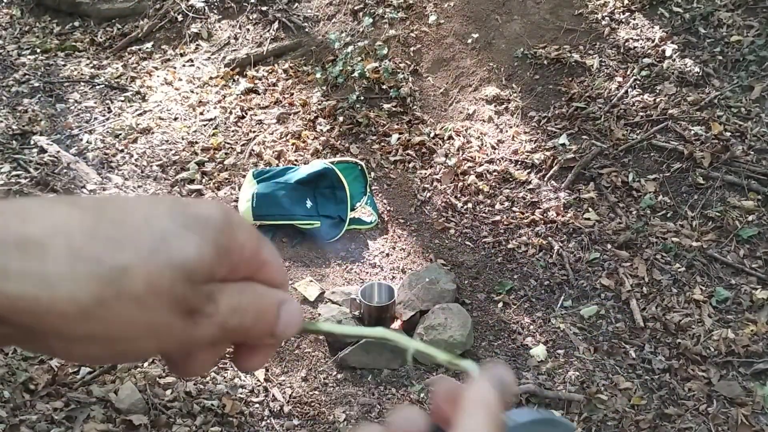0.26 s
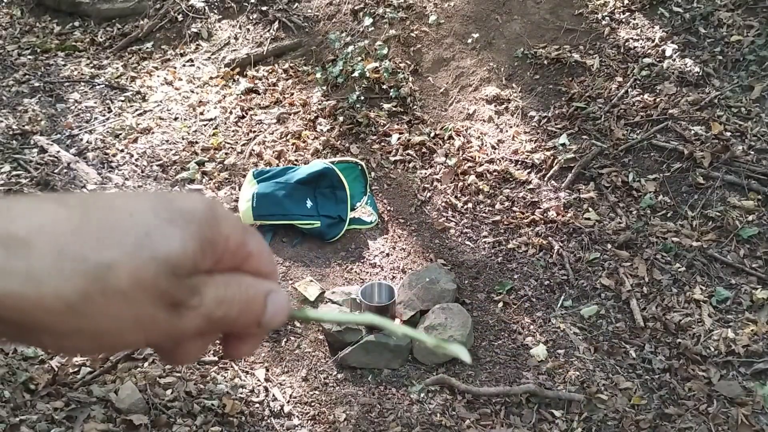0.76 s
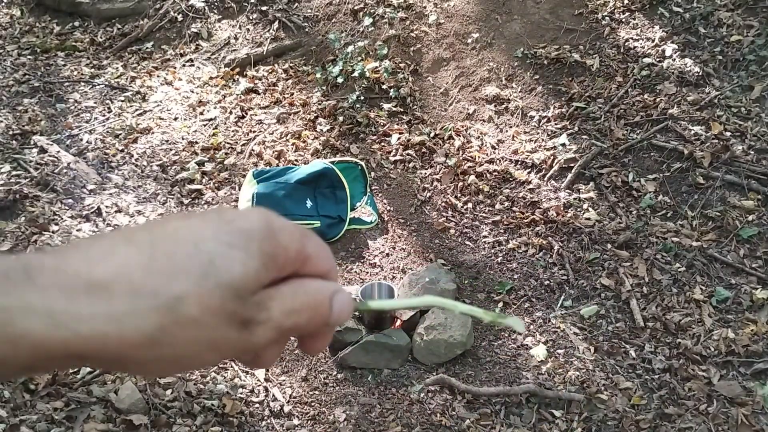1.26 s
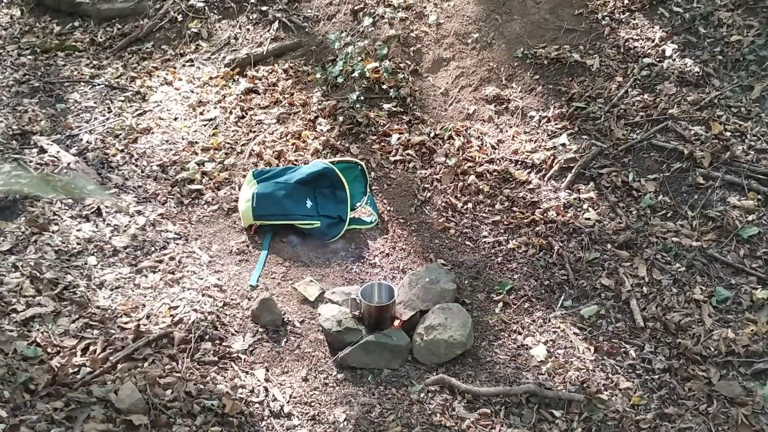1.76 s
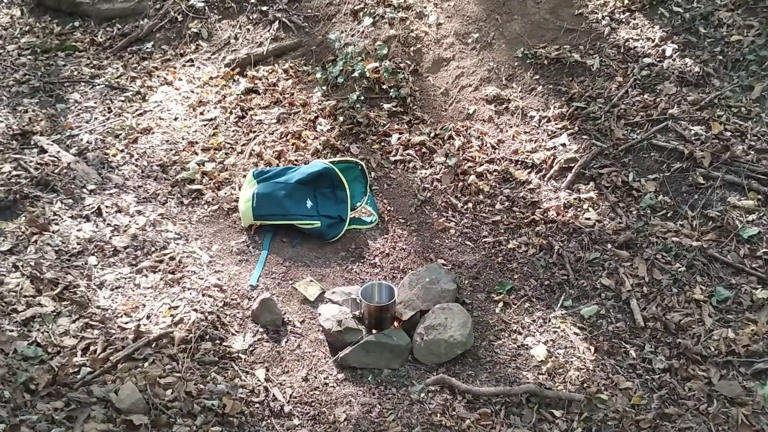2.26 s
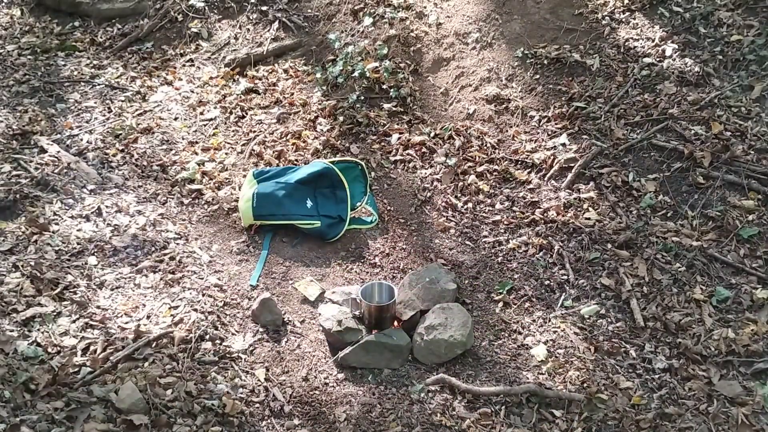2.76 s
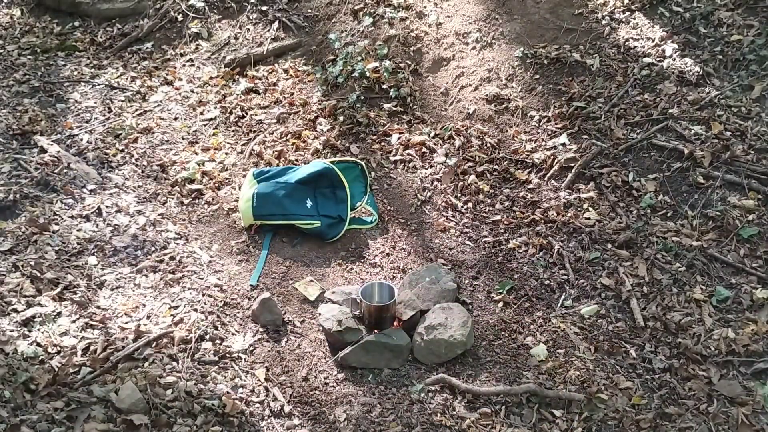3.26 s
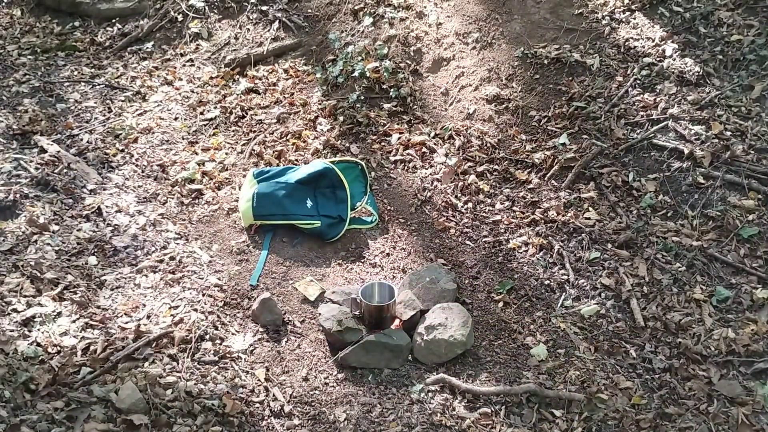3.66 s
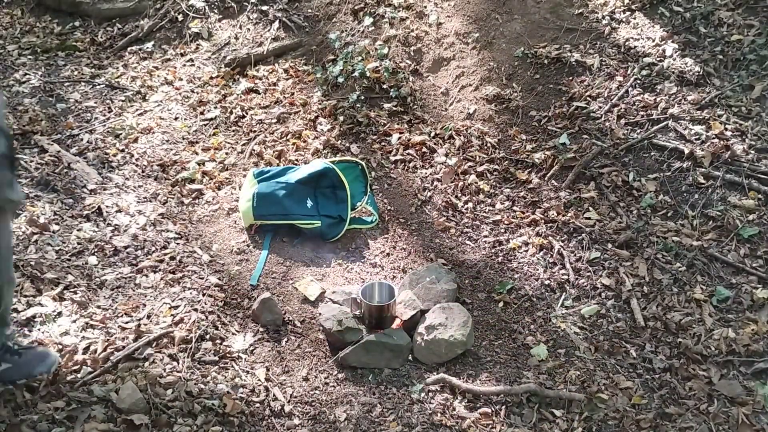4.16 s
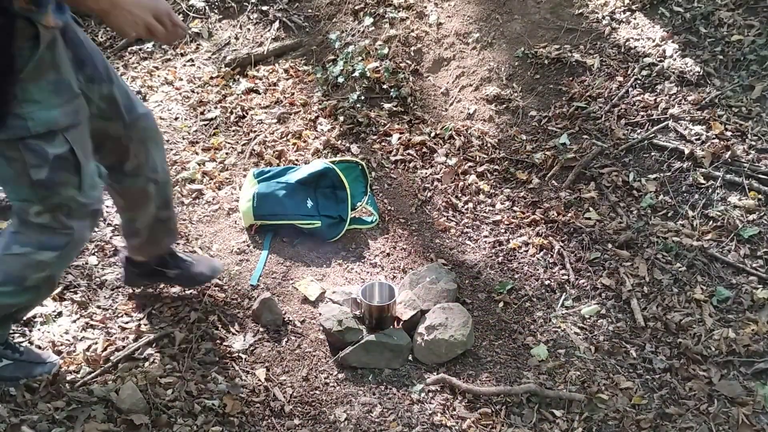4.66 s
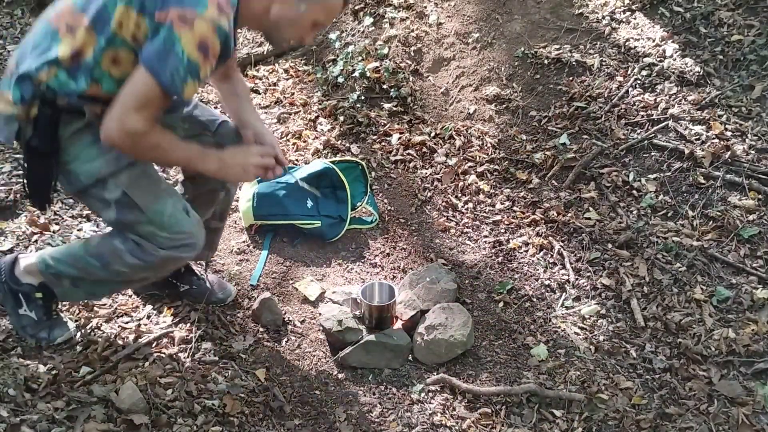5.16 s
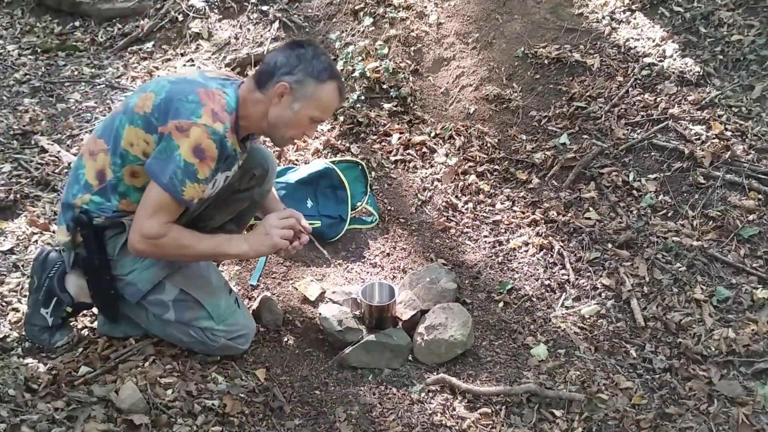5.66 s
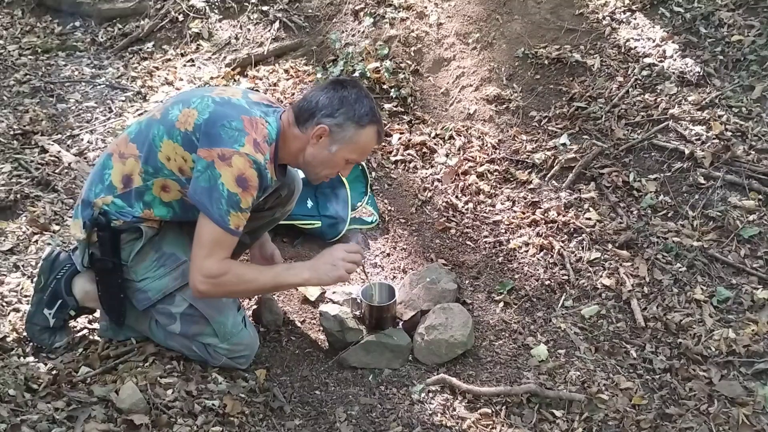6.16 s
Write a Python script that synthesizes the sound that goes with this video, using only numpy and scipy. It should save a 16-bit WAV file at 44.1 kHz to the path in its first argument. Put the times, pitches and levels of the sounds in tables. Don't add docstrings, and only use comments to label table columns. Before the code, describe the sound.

In a quiet forest, soft wind hiss and a couple of dull low bumps at the microphone come first. Then feet shuffle close on the left in brittle dry leaves, building to a loud crunch with snapping twigs. After a near-silent gap, lighter steps crackle round towards the front, and knees press into the leaves. Close stereo microphone, dry open air.

```python
import sys
import numpy as np
from scipy import signal
from scipy.io import wavfile

SR = 44100
rng = np.random.default_rng(int(sys.argv[2]) if len(sys.argv) > 2 else 0)


def attenuation_scalar(level_db):
    decades = np.asarray(level_db, float) / 20
    return 10 ** decades


def dump(signal):
    limited = np.clip(np.atleast_2d(signal).T, -1, 1)
    pcm = np.round(limited * 32767).astype(np.int16)
    wavfile.write(sys.argv[1], SR, pcm)


N = 282240
EDGES_HZ = np.append(25 * 2 ** np.arange(0, 8, .5), np.geomspace(6400, 17000, 6))
BASS_PAN_DB = 4.5


def rms_one(x):
    return x / np.sqrt(np.mean(x ** 2) + 1e-20)


def in_time(rows):
    s, *columns = np.transpose(rows)
    return [np.interp(np.arange(N) / SR, s, c) for c in columns]


def at_hz(points, hz):
    table_hz, value = np.array(points).T
    return np.interp(np.log(hz), np.log(table_hz), value)


def drift(rate):
    r = np.exp(-80 * np.pi * rate / SR)
    slow = signal.lfilter([1], [1, -2 * r, r * r], rng.standard_normal(N // 40 + 2002))[2000:]
    return np.interp(np.arange(N) / 40, np.arange(len(slow)), rms_one(slow))


def late(x, ms):
    fine = signal.resample_poly(x, 4, 1)
    return np.interp(np.arange(N) - ms * SR / 1000, np.arange(len(fine)) / 4, fine)


def bands(source, edges, alike_table, gain_of_band):
    out = 0
    for k, (low, high) in enumerate(zip(edges, edges[1:])):
        band = signal.butter(2, [low, high], "band", fs=SR, output="sos")
        shared, own = signal.sosfilt(band, source[k % 2])
        hz = np.sqrt(low * high)
        alike = np.clip(at_hz(alike_table, hz), 0, 1)
        second = alike * shared + np.sqrt(1 - alike ** 2) * own
        out = out + gain_of_band(hz) * np.array([shared, second])
    return out


def resonance(x, hz, width_hz):
    r = np.exp(-np.pi * width_hz / SR)
    poles = [1, -2 * r * np.cos(2 * np.pi * hz / SR), r * r]
    return signal.lfilter((1 - r * r) / 2 * np.array([1, 0, -1]), poles, x)


def add(out, s, sound, db):
    at = round(s * SR) - np.abs(sound[0]).argmax()
    out[:, at:at + sound.shape[1]] += attenuation_scalar(db) * sound / np.abs(sound).max(axis=1, keepdims=True)


# start_s, right_port_late_ms, left_over_right_db, fullness_db_per_octave (below the crackle)
WALKER = [(0, .32, 10, 5), (1.25, .32, 10.5, 4), (1.5, .32, 12, .5), (2.22, .33, 13.5, 2.5),
          (2.4, .33, 14, .5), (2.6, .33, 13.5, 0), (3.7, .29, 12.5, 1.5), (4.2, .22, 10, .6),
          (4.9, .21, 10, 0), (5.3, .17, 7.5, 0), (5.8, .14, 9, -1), (6.4, .14, 9, -.5)]


def walker():
    return in_time(WALKER)


# start_s,
# level_db, swell_s (20 dB), hold_s, fade_s (20 dB)
TREADS = [(1.219, -51.5, 0.058, 0.061, 0.112), (1.369, -53.5, 0.5, 0.197, 0.19),
          (1.653, -46.0, 0.113, 0.059, 0.122), (1.788, -49.5, 0.179, 0.086, 0.177),
          (1.928, -36.0, 0.101, 0.034, 0.154), (2.075, -46.0, 0.471, 0.071, 0.105),
          (2.211, -36.5, 0.023, 0.022, 0.04), (2.273, -43.0, 0.183, 0.041, 0.008),
          (2.357, -36.0, 0.076, 0.006, 0.011), (2.393, -30.5, 0.026, 0.071, 0.08),
          (2.517, -45.0, 0.26, 0.049, 0.192), (2.61, -56.5, 0.088, 0.126, 0.041),
          (2.83, -41.5, 0.018, 0.009, 0.05), (2.872, -49.5, 0.037, 0.024, 0.142),
          (2.997, -57.5, 0.02, 0.103, 0.107),
          (3.598, -42.5, .024, .025, .116), (3.697, -47, .018, .012, .06), (3.728, -42, .04, .008, .04),
         (3.776, -50.5, .226, .023, .094), (3.865, -53, .035, .01, .06), (3.892, -48, .03, .008, .05),
         (3.95, -64, .1, .07, .08), (4.12, -49, .06, .03, .348), (4.185, -32, .06, .053, .057),
         (4.304, -53.5, .34, .015, .035), (4.791, -48, .022, .03, .101), (4.849, -51.5, .089, .181, .035),
         (5.088, -44.5, .045, .03, .045), (5.155, -47, .02, .014, .087), (5.25, -50, .008, .002, .025),
         (5.605, -46, .015, .016, .058), (5.718, -41, .176, .003, .12), (5.794, -40, .077, .046, .221),
         (5.875, -46, .022, .106, .027), (6.02, -58.5, .03, .024, .315), (6.203, -59.5, .023, .11, .418)]
SETTLING_DB, SETTLING_FROM_S = -68, 1.1


def rustle_db():
    t = np.arange(0, N + 40, 40) / SR
    power = attenuation_scalar(2 * SETTLING_DB) * (t > SETTLING_FROM_S) + 1e-12
    for s, db, swell_s, hold_s, fade_s in TREADS:
        before, after = (s - t) / swell_s, (t - s - hold_s) / fade_s
        away = np.maximum(np.maximum(before, after), 0)
        power = power + attenuation_scalar(2 * (db - 20 * away))
    return np.interp(np.arange(N) / SR, t, 10 * np.log10(power))


def crackle(per_s, spread_db, clump_db, burst_ms, bed_db):
    born = rng.random(N) < per_s * attenuation_scalar(clump_db * drift(30)) / SR
    size = np.minimum(rng.exponential(1, N), 3.2)
    power = born * attenuation_scalar(2 * spread_db * size)
    r = np.exp(-2000 / (burst_ms * SR))
    distinct = rms_one(np.sqrt(signal.lfilter([1], [1, -r], power + 1e-12)))
    bed = attenuation_scalar(bed_db + 2.05 * drift(80))
    return rms_one(np.hypot(distinct, bed))


# pitch_hz, level_db (per Hz)
LEAVES = [(180, -46), (300, -19), (632, -11), (925, -14), (1110, -11), (1600, -10.5), (2540, -12.5),
          (3200, -14.5), (4310, -7.5), (6640, -5.5), (8940, 0.5), (15700, -9)]
# pitch_hz, likeness (0 to 1)
LEAVES_ALIKE = [(300, 0.8), (1500, 0.78), (4000, 0.52), (10000, 0.62)]
THINNING_PER_DB, HARD_TREAD_DB = .16, -45


def leaves():
    level_db, (_, pan_db, fullness) = rustle_db(), walker()
    fullness = fullness - THINNING_PER_DB * np.maximum(level_db - HARD_TREAD_DB, -10)
    grains = crackle(per_s=700, spread_db=4.3, clump_db=4.5, burst_ms=.2, bed_db=3.0)

    def gain(hz):
        below = np.clip(np.log2(7000 / hz), 0, 4)
        treble = np.clip(1 - below / 0.38, 0, 1)
        lean = (BASS_PAN_DB + (pan_db - BASS_PAN_DB) * treble) * np.array([[.3], [-.7]])
        return attenuation_scalar(at_hz(LEAVES, hz) + fullness * below + lean + level_db + 1.3 * drift(22.4))
    return attenuation_scalar(8.5) * bands(grains * rng.standard_normal((2, 2, N)), EDGES_HZ[7:], LEAVES_ALIKE, gain)


# start_s, level_db (peak), pitch_hz (centre)
CRACKS = [(1.2979, -20, 8400), (1.4878, -19, 7200), (1.5469, -28, 8300), (1.26, -28, 12500),
          (1.6297, -20, 9500), (1.6514, -22, 10000), (1.6879, -20, 10500), (1.9043, -19, 10300),
          (1.9405, -14, 8900), (2.0085, -17, 10200), (2.0838, -21, 9600), (2.1121, -21, 11700),
          (3.1138, -36, 10000), (2.1431, -20, 9500), (2.2184, -15, 9800), (2.2286, -2, 10000),
          (2.2341, -9, 9700), (2.2801, -14, 11100), (2.3071, -12, 9800), (2.3305, -17, 10300),
          (2.3603, -14, 11600), (2.3902, -14, 9900), (2.4215, -11, 9800), (2.6259, -24, 8600),
          (2.6892, -32, 9400), (2.7329, -32, 10800), (2.8362, -16, 8800), (2.84, -20, 8600),
          (2.8788, -26, 11400), (2.902, -21, 9400),
          (3.3968, -41, 9300), (3.4241, -42, 9300), (3.568, -38, 9500), (3.5995, -25, 10600),
              (3.6173, -20, 9600), (3.7025, -25, 8800), (3.7329, -19, 8700), (3.8032, -27, 9000),
              (3.8222, -30, 11300), (3.862, -30, 9500), (3.8939, -27, 13100), (3.8975, -22, 8800),
              (3.971, -39, 12000), (4.0132, -38, 10500), (4.1015, -24, 11500), (4.2504, -17, 10400),
              (4.4688, -38, 9100), (4.2329, -14, 9900), (4.2565, -19, 8800), (4.3527, -30, 11100),
              (4.6729, -40, 10000), (4.752, -39, 6300), (4.8163, -26, 10500), (4.8631, -27, 9500),
              (5.0006, -30, 9500), (5.0756, -29, 8700), (5.1658, -25, 10300), (5.1861, -29, 10700),
              (5.2036, -30, 7000), (5.2805, -38, 10400),
          (5.5469, -39, 9500), (5.6045, -28, 8300), (5.6185, -23, 10700), (5.718, -15, 9500),
                (5.7415, -25, 8800), (5.7697, -24, 13000), (5.7994, -16, 9300), (5.8021, -12, 9800),
                (5.8112, -21, 9500), (5.8486, -19, 8500), (5.8966, -24, 9900), (5.9153, -23, 10200),
                (5.9372, -23, 9000), (5.9672, -24, 9600), (6.0487, -34, 10000), (6.0796, -38, 10000),
                (6.206, -32, 11700), (6.232, -28, 9900), (6.2688, -35, 9200), (6.2801, -37, 8500),
                (6.3122, -37, 10000)]
# start_s, level_db (peak), burst_ms, pitch_hz (centre)
TEARS = [
    (4.0987, -28, 1.8, 9500),
    (5.2535, -25, 2.6, 6800),
]
CRACK_MS, CRACK_TOP_HZ = .2, 15800


def cracks():
    out, t_ms = np.zeros((2, N + 400)), np.arange(-200, 200) / SR * 1000
    pan_db = walker()[1]
    top_cut = signal.butter(4, CRACK_TOP_HZ, fs=SR, output="sos")
    rows = [(s, db, CRACK_MS, hz) for s, db, hz in CRACKS] + TEARS
    for (s, db, ms, hz), noise in zip(rows, rng.standard_normal((len(rows), 2, 400))):
        main_break = np.exp(-(t_ms / max(0.67 * ms, .03)) ** 2)
        splinters = 0.19 * np.exp(-np.abs(t_ms) / np.where(t_ms < 0, .8, 1.8))
        burst = (noise + 0.53 * noise[0]) * (main_break + splinters)
        ringing = resonance(resonance(burst, min(hz, 15000), 3800), 11000, 14000)
        edge = .34 * signal.lfilter([1, -2, 1], [2], burst)
        crack = signal.sosfilt(top_cut, ringing + edge)
        add(out, s, crack, db - .2 - np.array([[0], [pan_db[round(s * SR)]]]))
    return out[:, :N]


# start_s, level_db (peak), pitch_hz (centre)
KNOCKS = [(1.488, -30, 2600), (1.5667, -35, 1900), (1.6886, -37, 1700), (1.8494, -21, 2000),
          (1.8965, -31, 2300), (2.029, -39, 1700), (2.1315, -38, 1800), (2.2177, -25, 1700),
          (2.229, -17.5, 1090), (2.2348, -18.5, 1560), (2.3072, -22.5, 1560), (2.4207, -31, 1400),
          (2.5037, -35.5, 2100), (3.0461, -50, 1900), (3.2308, -58, 1800), (3.4643, -47, 1800),
          (3.6656, -32.5, 1100), (3.9005, -34, 2130), (4.0995, -41, 2700), (4.1983, -31, 2100),
          (4.2392, -26, 2300), (4.257, -25, 1600), (4.3345, -42, 1400), (4.4657, -47, 1500),
          (4.7831, -48, 1400), (4.82, -36.5, 1700), (5.101, -35, 2100)]
TWIG_BODY_HZ, TWIG_BODY_SHARE = 700, .7


def knocks():
    out = np.zeros(N + 600)[None]
    for (s, db, hz), (first, gap) in zip(KNOCKS, rng.random((len(KNOCKS), 2))):
        push = np.zeros(600)
        push[[20, 100 + int(60 * gap)]] = 1, .4
        low_mode = (.5 + first) * resonance(push, 0.59 * hz, 710)
        high_mode = resonance(push, 1.42 * hz, 1100)
        body = TWIG_BODY_SHARE * resonance(push, TWIG_BODY_HZ, 280)
        knock = signal.lfilter([.5], [1, -.45], low_mode - high_mode + body)
        add(out, s, knock[None], db - .5)
    return out[:, :N] * attenuation_scalar(np.array([[0], [-BASS_PAN_DB]]))


# start_s, level_db (peak), pitch_hz
BUMPS = [
    (0.148, -46, 82),
    (0.359, -47, 80.7),
    (0.64, -65, 134),
    (0.869, -51.5, 143),
]


def bumps():
    t = np.arange(N) / SR
    out = 0
    for s, db, hz in BUMPS:
        swell = np.exp(-((t - s - .02) / 0.016) ** 2)
        out = out + attenuation_scalar(db) * swell * np.sin(2 * np.pi * hz * (t - s))
    return out * attenuation_scalar(np.array([[2.5], [-3]]))


GATE_SHUT_DB, GATE_OPEN_DB, GATE_RELEASE_DB_PER_S = -66, -48, 200


def gate_shut():
    fall = GATE_RELEASE_DB_PER_S * np.arange(N) / SR
    held_db = np.maximum.accumulate(rustle_db() + fall) - fall
    return np.clip((GATE_OPEN_DB - held_db) / (GATE_OPEN_DB - GATE_SHUT_DB), 0, 1)


# start_s, level_db (gate open), lost_db (gate shut)
WIND = [(0, -56, 0), (.45, -55, 0), (.93, -56.5, 0), (.97, -56, 6.5), (1.15, -55.5, 4), (1.75, -55.5, 3),
        (2.0, -59, 4), (2.2, -59, 6), (2.4, -65, 6), (2.65, -63.5, 8), (2.85, -67, 7), (3.3, -64, 13),
        (3.55, -62, 7), (4.25, -62.5, 6.5), (4.7, -61.5, 11), (5.3, -62, 8), (5.8, -62, 8), (6.4, -60.5, 8)]
# pitch_hz, level_db (per Hz)
TREES = [(18, -40), (30, -17.5), (77, -1), (173, -2.5), (334, -3), (482, -4.5), (535, -6), (660, -5),
         (1090, -8), (1490, -9), (3820, -9), (8370, -9.5), (15700, -26.5)]
# pitch_hz, left_over_right_db
TREES_BALANCE = [(60, 5.5), (240, 4.5), (950, 5), (3770, 3), (15000, 11)]
# pitch_hz, likeness (0 to 1)
TREES_ALIKE = [(30, .6), (60, 0.72), (150, 0.95), (400, 0.9), (1000, .3), (3000, 0.095), (8000, 0.026)]
WIND_LAG_MS = 0.331
WIND_BRIGHT_DB_PER_OCTAVE, SHUT_BRIGHTENING = .03, .02


def wind():
    open_db, lost_db = in_time(WIND)
    gated_db = lost_db * gate_shut()
    level_db = open_db - gated_db
    bright = WIND_BRIGHT_DB_PER_OCTAVE + SHUT_BRIGHTENING * gated_db
    gust = drift(4.4)

    def gain(hz):
        lean = at_hz(TREES_BALANCE, hz) * np.array([[-.5], [.5]])
        tilt = bright * np.log2(hz / 300)
        sway = 0.58 * gust * np.clip(300 / hz, .4, 2.5) + 1.14 * drift(8.1)
        return attenuation_scalar(at_hz(TREES, hz) + lean + level_db + tilt + sway)
    right, left = attenuation_scalar(20.5) * bands(rng.standard_normal((2, 2, N)), EDGES_HZ, TREES_ALIKE, gain)
    return np.array([late(left, WIND_LAG_MS), right])


def scene():
    left, right = leaves() + cracks() + knocks()
    right_late_ms = walker()[0]
    return wind() + bumps() + np.array([left, late(right, right_late_ms)])


def low_pass(x):
    return signal.sosfilt(signal.butter(12, 16660, fs=SR, output="sos"), x)


def record(dry):
    steep_cut = signal.ellip(14, .5, 75, 15880, fs=SR, output="sos")
    mix = signal.sosfilt(steep_cut, dry)
    return low_pass(mix)


dry = scene()
out = record(dry)
dump(out)
```